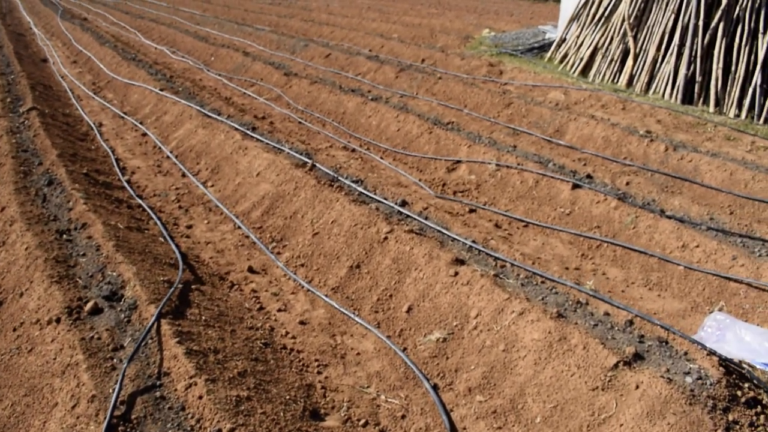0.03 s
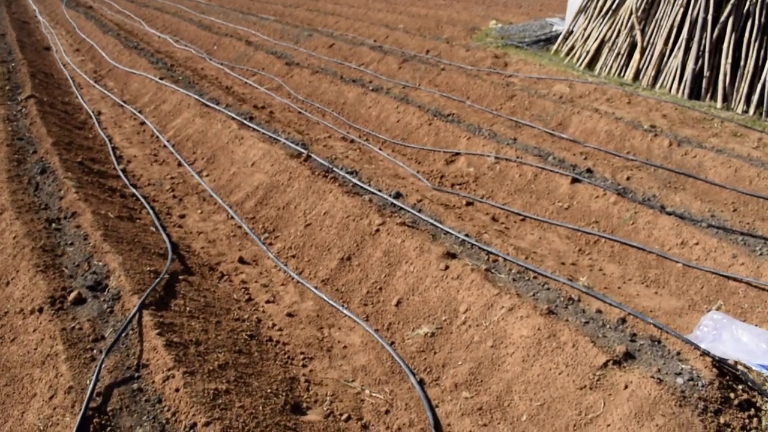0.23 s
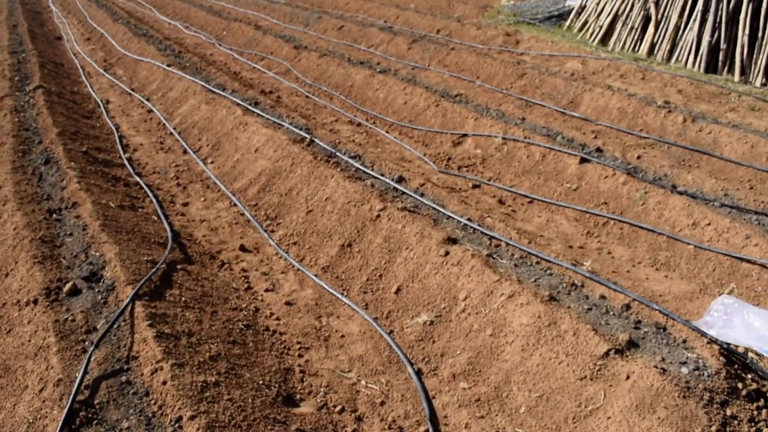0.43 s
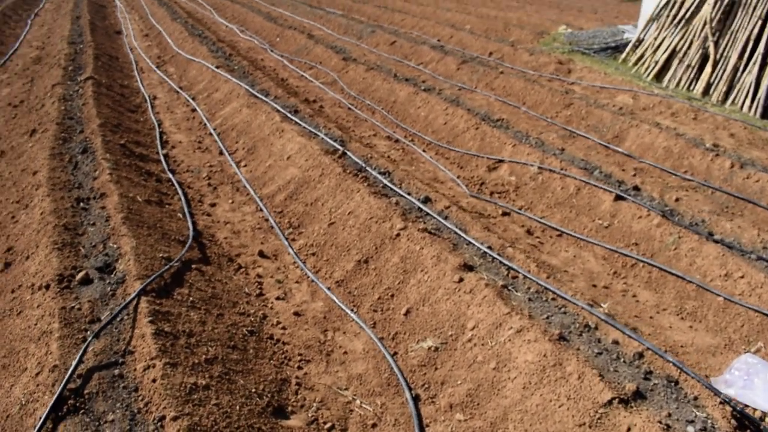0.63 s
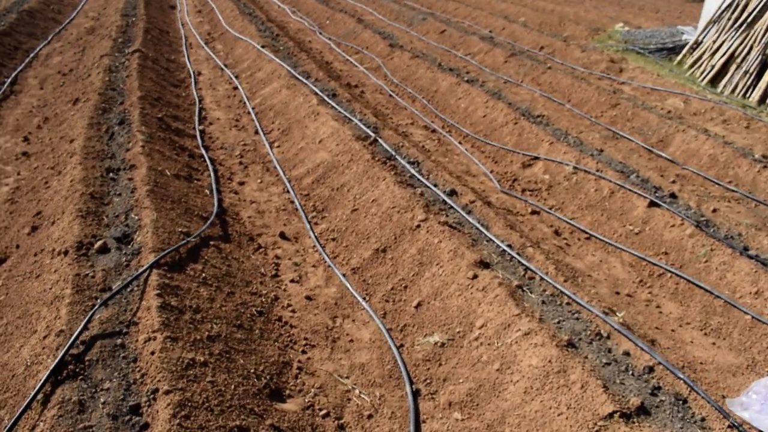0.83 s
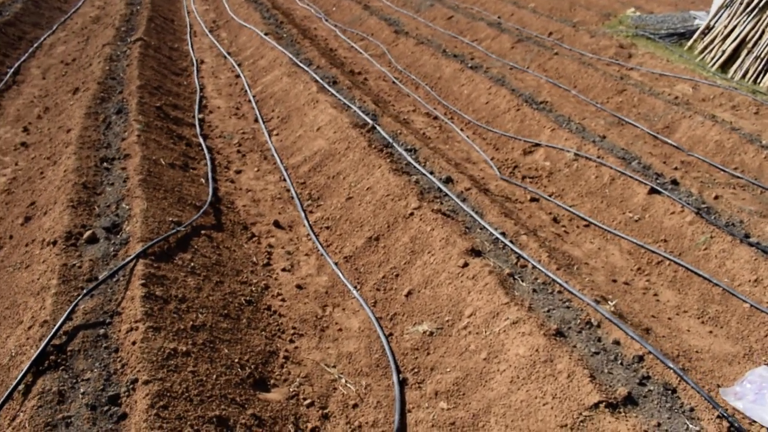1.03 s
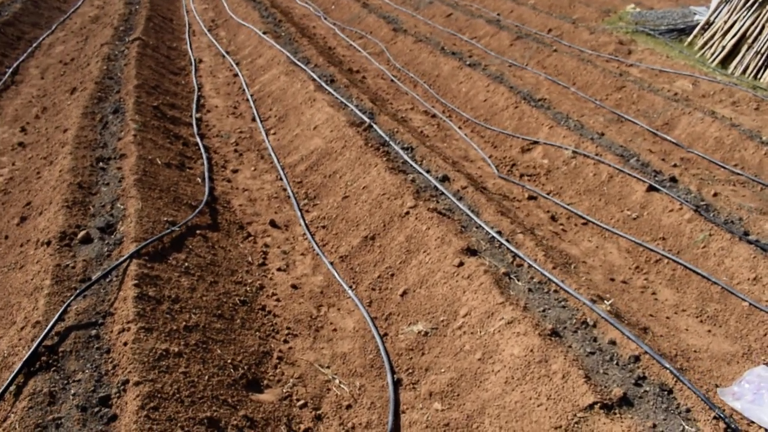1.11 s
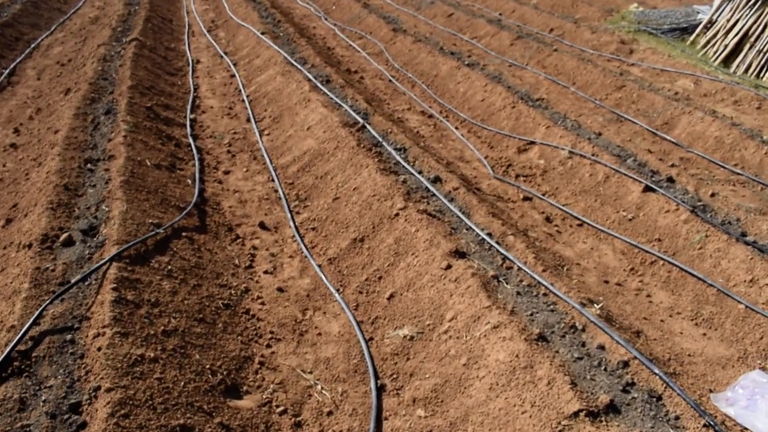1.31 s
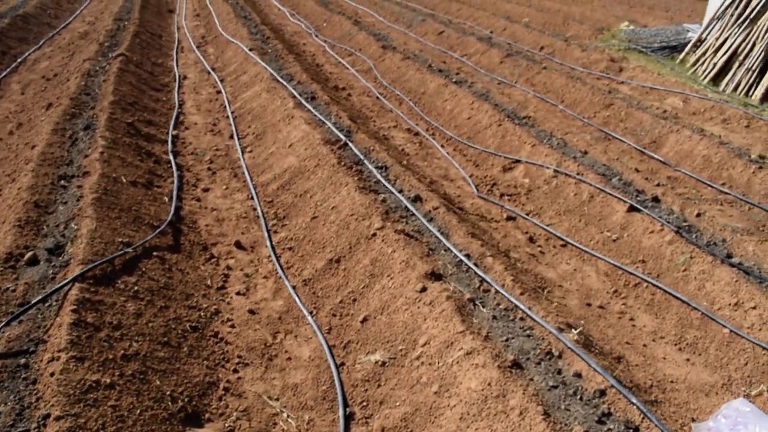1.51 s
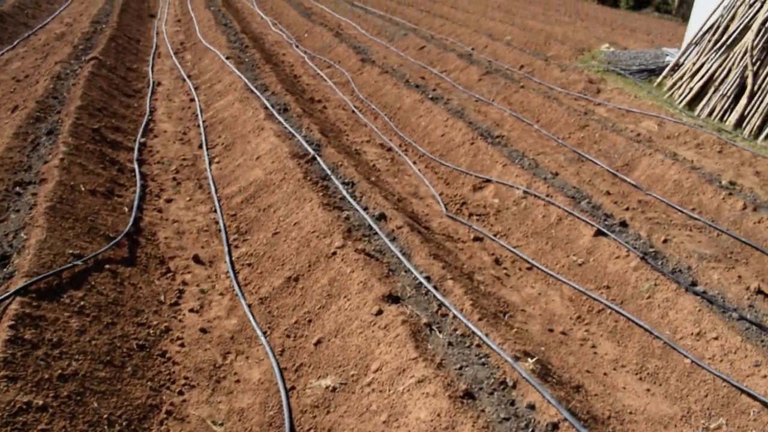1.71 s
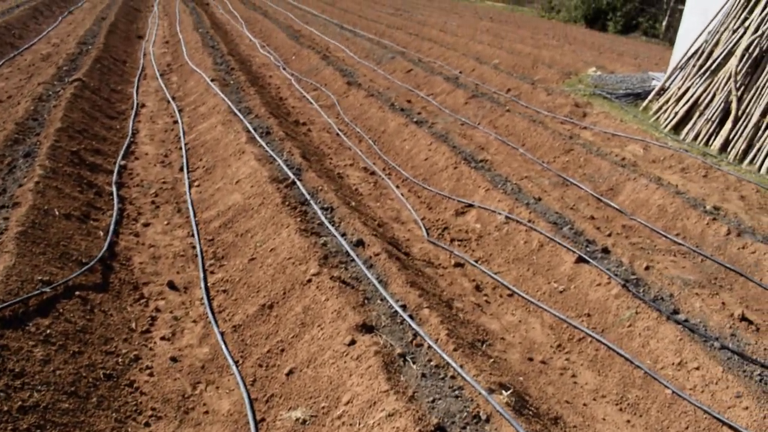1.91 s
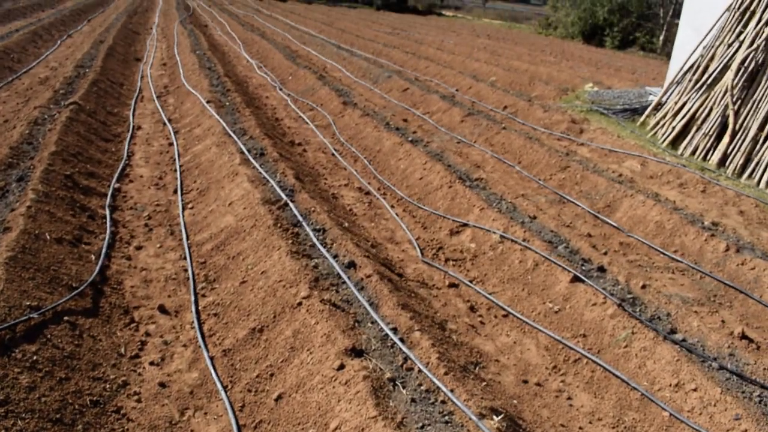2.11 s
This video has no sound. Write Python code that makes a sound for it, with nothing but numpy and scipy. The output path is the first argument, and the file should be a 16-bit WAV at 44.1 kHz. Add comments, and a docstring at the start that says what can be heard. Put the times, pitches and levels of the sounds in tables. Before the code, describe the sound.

Two slow footsteps crunch on dry tilled soil in an open field. Clothing rustles, and the hand-held microphone thumps and clinks during the first step; the second crunches longer, with snapping clods. Low rumble and hiss lie behind.

```python
"""Clothing rustles and a clod knocks: the first of two slow steps on dry tilled soil in an open field.
The microphones are on a hand-held camera, with the ground just below. Under the shoe clods knock,
soil crumbles, brittle bits snap and the heel scuffs. Right at the microphones a small hard part clinks
against the camera, whose mount thumps with each jolt. A low rumble and a steady hiss lie behind it all."""
import sys
import numpy as np
from scipy import signal
from scipy.fft import rfft, irfft, next_fast_len
from scipy.io import wavfile
from scipy.ndimage import uniform_filter1d, minimum_filter1d

SR = 44100
rng = np.random.default_rng(int(sys.argv[2]) if len(sys.argv) > 2 else 0)


def unload_wav(signal):
    """Save mono or channel-first audio to the path in sys.argv[1] as 16-bit WAV at rate SR, clipped to [-1, 1]."""
    wavfile.write(
        sys.argv[1],
        SR,
        np.round(np.clip(np.atleast_2d(signal).T, -1, 1) * 32767).astype(np.int16),
    )


N = 94815
TIME = np.arange(N) / SR


def from_db(db):
    """Decibels to gain."""
    return 10 ** (np.asarray(db) / 20)


def unit_rms(x):
    """Scale to unit rms."""
    return x / np.sqrt(np.mean(x ** 2) + 1e-20)


def colour(x, spectrum):
    """Causal (minimum-phase) filter with the given spectrum; the result has unit rms."""
    size = 2 * next_fast_len(N)
    hz, db = np.transpose(spectrum)
    bin_hz = np.arange(size // 2 + 1) * SR / size
    log_gain = np.log(from_db(np.interp(np.log(bin_hz + 1), np.log(hz), db)))
    cepstrum = irfft(log_gain)[:size // 2]
    response = np.exp(2 * rfft(cepstrum, size))
    return unit_rms(irfft(rfft(x, size) * response)[:N])


def band_pass(x, hz, octaves):
    """Keep a band of the given width around a centre."""
    edges = np.clip([hz * 2 ** (-octaves / 2), hz * 2 ** (octaves / 2)], 10, SR / 2 - 10)
    return signal.sosfilt(signal.butter(2, edges, "band", fs=SR, output="sos"), x + 1e-18)


def band_noise(hz, octaves):
    """Noise in one band, at about unit rms."""
    width_hz = hz * (2 ** (octaves / 2) - 2 ** (-octaves / 2))
    return band_pass(rng.standard_normal(N), hz, octaves) / np.sqrt(2 * width_hz / SR)


def ring(start, hz, t60):
    """A damped sine struck at the given time."""
    age = np.maximum(TIME - start, 0)
    return np.sin(2 * np.pi * hz * age) * np.exp(-np.minimum(np.log(1000) * age / t60, 60))


def burst(start, decay_s):
    """Envelope with a sudden start and an exponential tail."""
    age = TIME - start
    return (age >= 0) * np.exp(-np.minimum(np.abs(age) / decay_s, 60))


def friction(rows, octaves):
    """Soft rises and falls of sliding noise, each in its own band."""
    return sum(from_db(db) * np.exp(-((TIME - middle) / half_s) ** 2 / 2) * band_noise(hz, octaves)
               for middle, half_s, db, hz in rows)


def fracture(start, decay_s, hz, octaves):
    """One sharp break and a short spray of tiny ones, ringing in one steep-sided band."""
    spray_samples = decay_s * SR / 2
    first_break = np.arange(N) == int(start * SR)
    spray = burst(start, decay_s) * rng.standard_normal(N) / np.sqrt(spray_samples)
    breaks = band_pass(first_break + 0.67 * spray, hz, octaves)
    return unit_rms(band_pass(breaks, hz, octaves)) * np.sqrt(spray_samples / N)


# Air over the open field: (frequency [Hz], relative density [dB])
AIR_SPECTRUM = [(12, 3.5), (22, -1.5), (35, 2.5), (50, -0.5), (75, -2), (110, -7), (160, -14), (290, -15),
                (450, -23.5), (700, -24), (1300, -24), (2500, -28), (6000, -32.5), (15500, -34)]


def field_air():
    """A low rumble and a faint drone, the same at both microphones."""
    drone_hz, drone_width_hz = 108.8, 11.6
    rumble = from_db(-39) * colour(rng.standard_normal(N), AIR_SPECTRUM)
    drone = from_db(-53.5) * band_noise(drone_hz, np.log2(1 + drone_width_hz / drone_hz))
    return rumble + drone


# Self-noise of the microphones: (frequency [Hz], relative density [dB])
HISS_SPECTRUM = [(50, -76), (150, 1), (2000, -25.5), (4000, -14), (7000, -5.5), (12000, -5.5),
                 (15500, -5.5)]


def microphone_hiss():
    """The microphones' own steady hiss, opposite in sign left and right."""
    hiss = from_db(-57) * colour(rng.standard_normal(N), HISS_SPECTRUM)
    return hiss * np.array([[1], [-1]])


# Clothing near the microphones: (middle [s], half length [s], level [dB], centre [Hz])
CLOTH_BRUSHES = [(0.04, 0.17, -47, 4640), (.77, 0.083, -52, 3930), (.82, 0.039, -49, 9400),
                 (2.15, 0.033, -49.5, 6900)]


def clothing_rustle():
    """Cloth slides with a soft hiss."""
    return friction(CLOTH_BRUSHES, octaves=1.4)


# Jolts that reach the microphones through the camera mount: (time [s], level [dB])
MOUNT_JOLTS = [(0.223, -28), (.357, -20.5), (0.498, -14), (1.771, -23.5), (2.043, -34)]


def mount_thumps():
    """Soft pushes set the mount swinging at one low pitch."""
    attack_s = .005
    return -sum(from_db(db) * ring(start, hz=68, t60=.27) * (1 - burst(start, attack_s))
                for start, db in MOUNT_JOLTS)


# A loose part taps the camera, right at the microphones: (time [s], level [dB], tilt [dB/octave])
PART_TOUCHES = [(0.2348, -25.5, 18), (0.2436, -2.5, 7.5), (0.291, -35, -11), (0.4057, -31, 13),
                (0.42, -36, 0), (0.436, -30.5, 20), (0.4712, -31.5, -8), (0.61, -31, 15)]
# Modes of that part: (frequency [Hz], relative level [dB], t60 [s])
PART_MODES = [(1044, 0, .056), (1142, -11, .06), (1690, -21, .068), (2095, -39, .05), (2912, -39, .04)]


def loose_part_clinks():
    """Each touch rings the same modes; the two lowest beat against each other."""
    lowest_hz, attack_s = PART_MODES[0][0], .0004
    out = 0
    for start, db, tilt in PART_TOUCHES:
        modes = 0
        for k, (hz, mode_db, t60) in enumerate(PART_MODES):
            gain = from_db(db + mode_db + tilt * np.log2(hz / lowest_hz))
            modes += (-1) ** k * gain * ring(start, hz, t60)
        out += modes * (1 - burst(start, attack_s))
    return out


# The heel on the ground below the camera: (middle [s], half length [s], level [dB], centre [Hz])
HEEL_PRESSES = [(.455, 0.027, -41, 202), (.585, 0.03, -42, 282), (.86, 0.019, -46.5, 450),
                (.99, 0.017, -46.5, 408), (1.13, 0.022, -48, 540), (1.395, 0.02, -43.5, 337),
                (1.55, 0.063, -37, 393)]


def heel_scuffs():
    """The heel presses the soil with a dull scuff."""
    return friction(HEEL_PRESSES, octaves=1.34)


def soil_grains(per_s, spread_db, pitch_count):
    """Crumbs of uneven size burst at random, each ringing briefly at one of a set of pitches."""
    sizes = from_db(spread_db * np.minimum(rng.exponential(1, N), 4)) * rng.choice([-1, 1], N)
    clicks = sizes * (rng.random(N) < per_s / SR)
    pitch_index = rng.integers(0, pitch_count, N)
    out = 0
    for k, hz in enumerate(np.geomspace(300, 9000, pitch_count)):
        resonance = signal.iirpeak(hz, Q=2.6, fs=SR)
        crumbs = signal.lfilter(*resonance, clicks * (pitch_index == k) + 1e-18)
        out += unit_rms(crumbs) * hz ** 0.087  # high pitches are slightly stronger
    return unit_rms(out)


# Soil crumbling under the sole: (time [s], level [dB])
CRUNCH_LEVELS = [(0, -43), (.04, -43), (.2, -45), (.26, -53), (.38, -48.5), (.43, -37.5), (.5, -47.5),
                 (.555, -41.5), (.6, -44), (.8, -48.5), (.95, -54), (1.36, -56), (1.41, -40), (1.445, -37),
                 (1.465, -28), (1.53, -35), (1.62, -27), (1.67, -35.5), (1.72, -33.5), (1.80, -41.5),
                 (1.87, -37), (1.92, -43.5), (1.945, -36.5), (1.97, -41), (2.06, -40.5), (2.11, -45.5),
                 (2.15, -40.5)]
# Its tone from camera height: (frequency [Hz], relative gain [dB])
CRUNCH_SPECTRUM = [(100, -17), (250, -12.5), (500, -2), (1000, 0.5), (1500, -0.5), (2200, -5), (3500, -7.5),
                   (5500, -12), (8000, -19.5), (15000, -29)]


def soil_crunch():
    """Dense grains, with fine dust between them, follow the load on the sole."""
    grains = soil_grains(per_s=3000, spread_db=3.6, pitch_count=18)
    dust = .35 * rng.standard_normal(N)
    load = from_db(np.interp(TIME, *np.transpose(CRUNCH_LEVELS)))
    return load * colour(grains + dust, CRUNCH_SPECTRUM)


# Brittle bits underfoot: (time [s], level [dB], centre [Hz])
BRITTLE_BREAKS = [(0.232, -31.5, 7400), (.2424, -20, 3800), (0.4242, -24, 1990), (.4225, -33, 6000),
                  (0.4376, -17.5, 2450), (1.3573, -33, 5760), (1.3578, -30.5, 1940), (1.4492, -19, 3060),
                  (1.547, -34, 4800), (1.592, -20.5, 3200), (1.6187, -25, 7700), (1.6221, -16, 3300),
                  (1.622, -26, 4360), (1.6677, -29.5, 5600), (1.7024, -20.5, 3130), (1.7031, -26, 6840),
                  (1.7206, -12, 3600), (1.757, -29.5, 3700), (1.8215, -35, 3830), (1.886, -21, 2760),
                  (1.956, -17, 5200), (1.99, -26.5, 3800), (2.046, -28.5, 4170), (2.0655, -32, 4500),
                  (2.072, -26, 4740)]


def brittle_snaps():
    """Dry crumbs and stalks break with a bright tick."""
    return sum(from_db(db) * fracture(start, decay_s=0.00038, hz=hz, octaves=0.85)
               for start, db, hz in BRITTLE_BREAKS)


# Clods under the shoe, close by: (time [s], knock level [dB], pitch [Hz], t60 [s], crack level [dB])
CLOD_HITS = [(0.024, -16.5, 1245, 0.0065, -24.5), (.2337, -3.5, 504, 0.003, -22.5),
             (.405, -12.5, 574, 0.0043, -29.5), (.4369, -8.5, 1490, 0.0044, -27),
             (.4695, -8.5, 600, 0.0035, -44), (.541, -20.5, 910, 0.039, -29.5),
             (0.5446, -27.5, 207, 0.11, -61), (.5465, -18, 558, 0.032, -32),
             (0.5502, -17.5, 405, 0.043, -39), (0.554, -30, 1040, 0.036, -42),
             (0.6064, -29, 463, 0.013, -45), (0.664, -32, 900, .015, -37), (0.675, -26, 840, 0.012, -39),
             (1.4037, -22, 590, 0.026, -51), (1.4553, -19, 1000, 0.0045, -29),
             (1.4687, -13, 1080, 0.003, -30), (1.519, -12.5, 1180, .007, -39), (1.546, 2, 500, 0.0083, -17),
             (1.604, -26, 247, 0.079, -46), (1.608, -14, 890, 0.015, -45), (1.629, -19, 1270, 0.022, -38),
             (1.648, -30, 756, 0.019, -38), (1.676, -18.5, 915, .016, -32), (1.7044, -28, 1300, 0.014, -40),
             (1.7209, 0.5, 770, 0.0033, -28), (1.733, -24.5, 1240, 0.021, -23.5),
             (1.8213, -14, 1340, 0.0016, -27.5), (1.8528, -8, 1330, 0.0079, -21),
             (1.8596, -19, 765, 0.01, -44), (1.8854, -13.5, 1230, 0.0074, -44),
             (1.896, -21, 960, 0.0094, -40), (1.9554, -25.5, 1070, 0.013, -29.5),
             (1.999, -28.5, 970, 0.017, -33), (2.1339, -18.5, 920, 0.0086, -46)]


def clod_knocks():
    """A clod knocks with a few dull cycles and breaks with a short crack."""
    low_hz, high_hz = 790, 2620  # band of the crack
    crack_hz, crack_octaves = np.sqrt(low_hz * high_hz), np.log2(high_hz / low_hz)
    out = 0
    for start, db, hz, t60, crack_db in CLOD_HITS:
        # a clod radiates little below its own pitch
        bass_cut = signal.butter(2, .75 * hz, "high", fs=SR, output="sos")
        knock = signal.sosfilt(bass_cut, ring(start, hz, t60))
        crack = fracture(start, decay_s=0.0024, hz=crack_hz, octaves=crack_octaves)
        out += from_db(crack_db) * crack - from_db(db) * knock
    return out


def scene():
    """Camera, steps and clothing sit close and central, over the field's air and the hiss."""
    camera = loose_part_clinks() + mount_thumps()
    walker = clod_knocks() + brittle_snaps() + soil_crunch() + clothing_rustle() + heel_scuffs()
    return camera + walker + field_air() + microphone_hiss()


def limiter(x, ceiling_db, recovery_db_per_s, window_s):
    """The gain drops on the loudest peaks and recovers slowly."""
    peak_db = 20 * np.log10(np.abs(x).max(axis=0) + 1e-9)
    over_db = np.maximum(peak_db - ceiling_db, 0)
    recovery_db = recovery_db_per_s * TIME
    held_db = np.maximum.accumulate(over_db + recovery_db) - recovery_db
    size = int(window_s * SR)
    gain_db = uniform_filter1d(minimum_filter1d(-held_db, size), size)  # eases down ahead of a peak
    return x * from_db(gain_db)


def record(dry):
    """The camera limits the peaks and cuts the top treble steeply."""
    limited = limiter(dry, ceiling_db=-5, recovery_db_per_s=9, window_s=.001)
    cutoff_hz = 15900
    return signal.sosfilt(signal.ellip(12, .1, 80, cutoff_hz, fs=SR, output="sos"), limited)


dry = scene()
out = record(dry)
unload_wav(out)
```